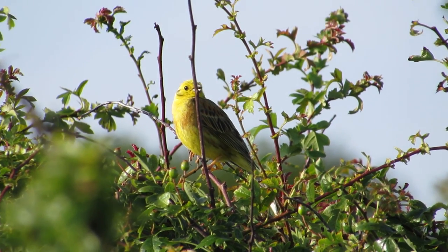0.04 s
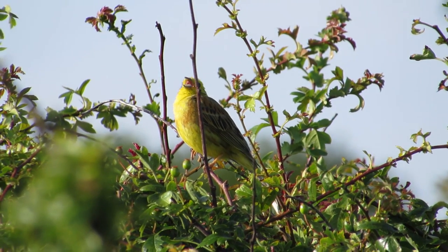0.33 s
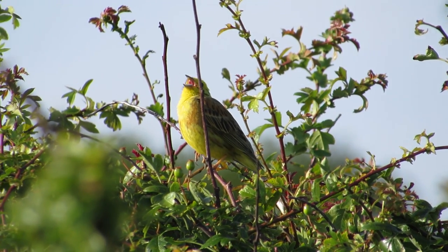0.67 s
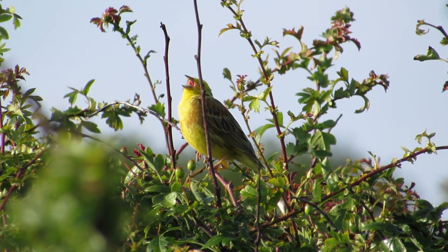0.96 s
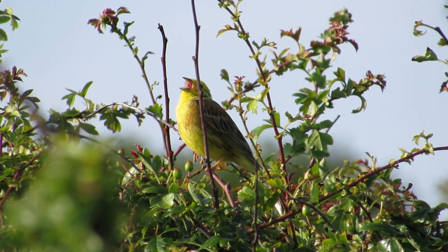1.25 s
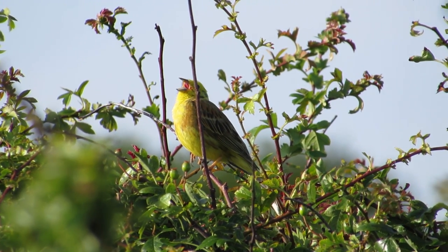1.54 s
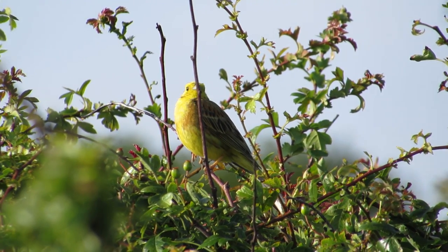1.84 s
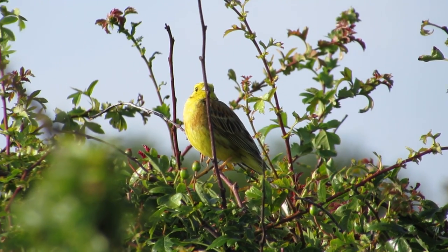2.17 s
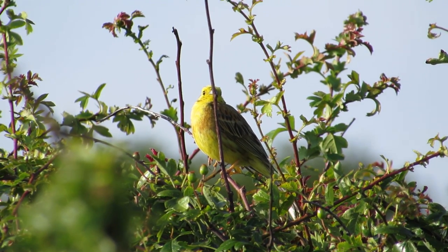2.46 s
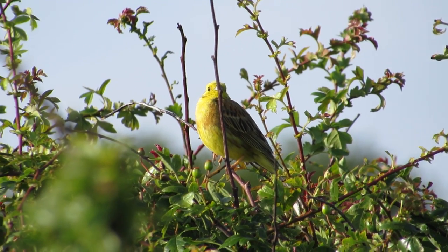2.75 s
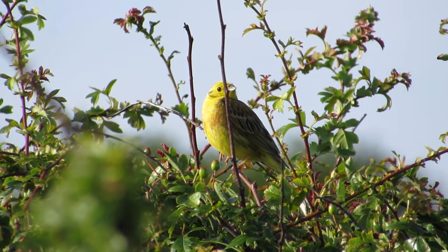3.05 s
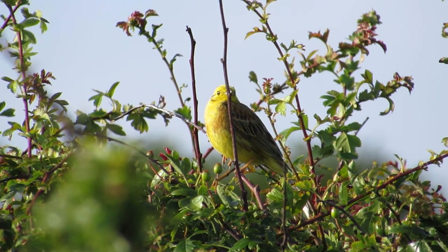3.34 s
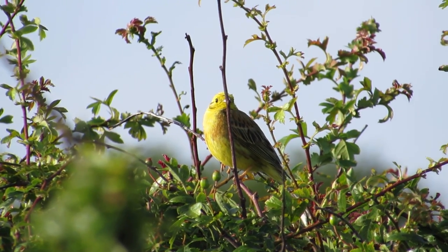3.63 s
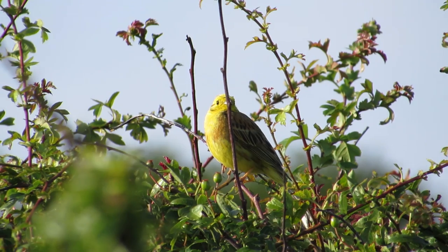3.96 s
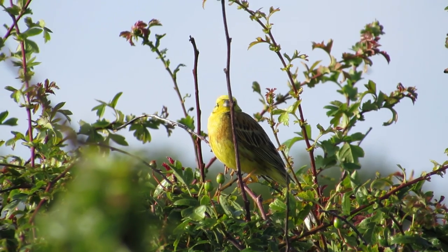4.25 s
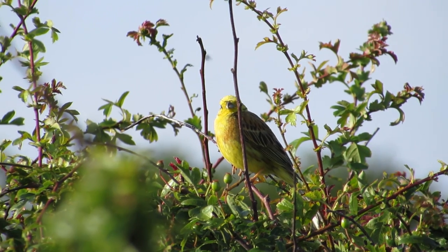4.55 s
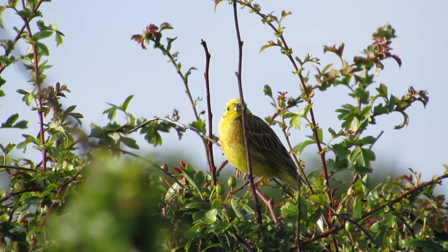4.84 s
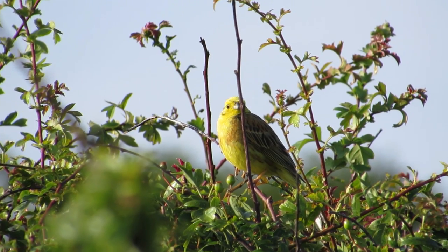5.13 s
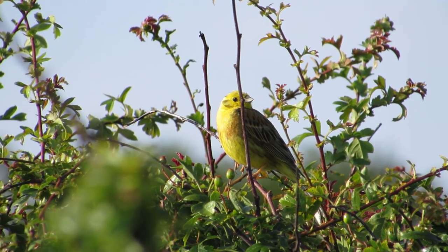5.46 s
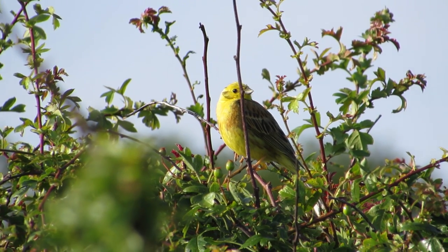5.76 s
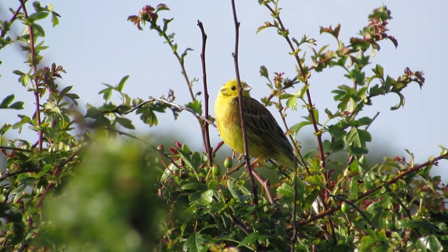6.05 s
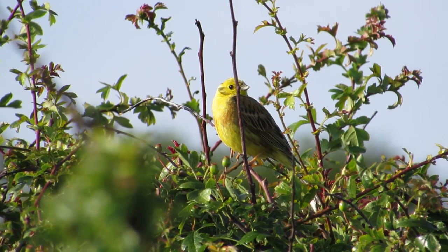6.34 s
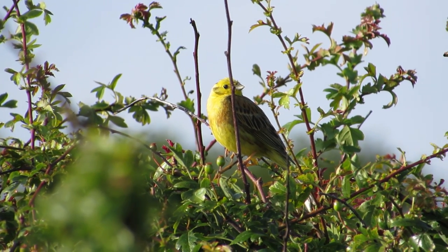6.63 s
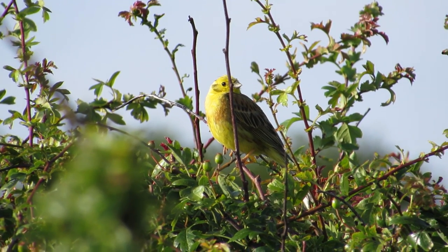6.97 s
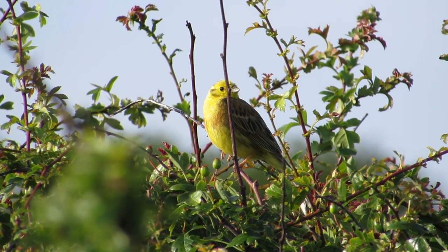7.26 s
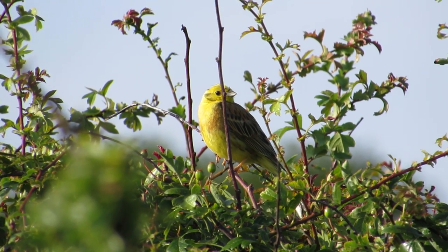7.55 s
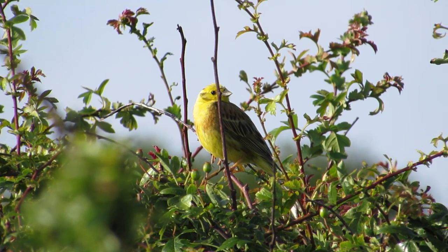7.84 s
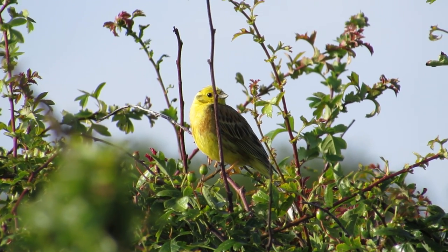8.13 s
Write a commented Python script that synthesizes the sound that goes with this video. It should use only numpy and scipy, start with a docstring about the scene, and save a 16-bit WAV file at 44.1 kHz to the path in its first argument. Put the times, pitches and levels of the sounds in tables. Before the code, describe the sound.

Outdoors by a hedge, a nearby bird opens with a fast, swelling run of buzzy notes and a held high note, with a short hollow knock at the start. It then falls silent, leaving quiet falling chirps off to the left, faint whistles and hoarse far calls. An echoing clatter sounds in the distance, and later another soft knock. Gentle air, microphone hiss and a faint camera whirr continue throughout.

```python
"""Yellowhammer in a hedge

Close to the microphones a yellowhammer sings twelve quick falling syllables that swell, then one long,
thin buzzing note. Farther off to the left another bird repeats falling chirps; others twitter and call
faintly in the distance. Two knocks ring a hollow body and a far clatter arrives blurred by its echoes.
Under it all lie open-air hush, microphone hiss and the hum and whirr of the camera."""
import sys
import numpy as np
from scipy import signal
from scipy.fft import rfft, irfft
from scipy.io import wavfile

SR = 44100
rng = np.random.default_rng(int(sys.argv[2]) if len(sys.argv) > 2 else 0)


def wav_out(sig):
    """Save sig, one row per channel (or a flat mono array), as 16-bit PCM at SR to the path in sys.argv[1]."""
    wavfile.write(sys.argv[1], SR, np.round(np.clip(np.atleast_2d(sig).T, -1, 1) * 32767).astype(np.int16))


N = 366030
HZ = np.fft.rfftfreq(N, 1 / SR)

# steady noise of the open air, the microphones and the camera: frequency_hz, level_db_per_hz
AIR_SPECTRUM = [(15, -78), (35, -80), (50, -71), (62, -81), (78, -63), (100, -80), (170, -82.5),
                (400, -83.5), (900, -78.5), (1500, -81), (2400, -90), (3500, -88.5), (4500, -100),
                (16000, -125)]
HISS_SPECTRUM = [(20, -85.5), (4400, -92), (7000, -93), (8600, -96), (11000, -100), (13500, -104),
                 (15200, -110)]
WHIRR_SPECTRUM = [(20, -91), (100, -100), (180, -77.5), (300, -73), (440, -77), (700, -79), (1000, -102),
                  (2000, -100), (16000, -140)]
# resonances of the camera's case: frequency_hz, half_width_hz, level_db_per_hz, left_over_right_db
CASE_MODES = [(505.7, 25, -72, -3), (577, 32, -65.5, -3), (728, 32.4, -62.5, -5), (829.7, 31, -64.5, -6),
              (927.5, 52, -68.5, -11.5), (999, 44, -70.5, -7), (1215, 21, -76, -21), (1363, 16.5, -72.5, 1),
              (2135, 11, -78.5, -6)]
# the camera's steady tones: frequency_hz, rms_db, left_over_right_db, left_lead_rad
HUM_TONES = [(38.7, -54.5, -7.5, -0.42), (66.8, -53, -9.5, -0.26), (136, -67, -6, -0.063),
             (13252, -85.5, 4, -1.4)]
# the yellowhammer's syllables: strongest_flick_s, level_db, swell_delay_s
SONG_SYLLABLES = [(0.0408, -47, 0.002), (.1435, -41.5, 0.0038), (0.2445, -32, -0.00015),
                  (.339, -29.5, 0.0026), (.434, -26, .0065), (.532, -23.5, 0.0046), (.632, -21.5, .0007),
                  (.728, -19.5, 0.00013), (0.8213, -19.5, .0005), (.9175, -18.5, 0), (1.012, -17, .0029),
                  (1.109, -17.5, 0.0022)]
# blows on a hollow body: start_s, peak_db, rattle_s, tilt_db_per_octave
KNOCK_BLOWS = [(.2217, -24.2, .01, 1), (7.2058, -28.7, .005, -4)]
# resonances of that body: frequency_hz, level_db, t60_s, left_over_right_db
BODY_MODES = [(480, -10, .04, -2), (690, -2, .04, -2), (830, 3, .05, -2), (1000, 0, .04, 0),
              (1180, -2, .045, 1), (1362, -3, .034, 2), (1690, -10, .03, 3), (2220, -3, .031, 6),
              (2520, -6, .025, 7), (3040, -3, .03, 7), (3480, -6, .02, 7), (4250, -12, .012, 6)]
# the bird off to the left: loudest_s, level_db, pitch_hz, fall_hz_per_s, burr_fraction, rise_s
LEFT_CHIRPS = [(.676, -48, 3080, 12400, .05, .05), (1.19, -48, 2994, 15100, 0, .042),
               (2.01, -47.5, 3220, 14030, .05, .056), (2.729, -50.5, 3150, 12000, 0.05, .052),
               (3.45, -51, 3080, 14460, .05, .04), (4.184, -46.5, 3050, 17000, 0.1, 0.041),
               (4.404, -43, 3244, 13540, 0.88, 0.054), (4.688, -41, 3420, 22500, 0.4, 0.047),
               (5.32, -45, 3090, 12530, 0.13, .056), (6.225, -44.5, 3140, 13460, .1, .052),
               (7.084, -45, 3110, 12000, 0, .052), (7.316, -43.5, 3260, 13500, 0.99, 0.057),
               (7.736, -47, 3200, 9400, .5, .05)]
# hoarse calls from far off: start_s, length_s, level_db, centre_hz
HOARSE_CALLS = [(1.58, 0.15, -58, 1500), (5.336, 0.17, -54, 1597), (5.849, 0.24, -55.5, 1620),
                (6.199, 0.19, -58, 1544), (6.651, 0.094, -56.5, 1617)]
# the long note's end flick, then pips of small birds: start_s, level_db, start_pitch_hz, rise_hz
RISING_GLIDES = [(1.817, -54, 4800, 1100), (2.49, -57, 4900, 800), (4.592, -56.5, 6400, 450),
                 (5.087, -60, 6550, 350), (5.32, -58, 6600, 250)]
# the songbird across the field: start_s, length_s, level_db, pitch_hz, range_hz
FAR_PHRASES = [(2.97, .28, -56, 2280, 148.6), (3.6, 0.29, -57.5, 2280, 151), (4.788, .31, -55.5, 1980, 25)]
# distant bangs: start_s, level_db, t60_s
FAR_BANGS = [(4.324, -38.5, .7), (4.385, -52, 0.92)]
# their colour at the microphones: frequency_hz, level_db
BANG_SPECTRUM = [(300, -30), (700, -11), (1050, -2), (1650, -1.5), (2100, -12.5), (3200, -10), (4500, -22),
                 (8000, -40)]
# decay of the scatter from leaves and ground: frequency_hz, t60_s
SCATTER_DECAY = [(200, 0.21), (1500, 0.1), (5000, 0.27), (12000, 0.044)]
# the camera's narrow filters: frequency_hz, half_width_hz
CAMERA_NOTCHES = [(3950, 158), (7900, 106)]


def gain_of(db):
    """Decibels to amplitude."""
    return 10 ** (np.asarray(db) / 20)


def panned(pan_db):
    """Gains at the two microphones, the left pan_db above the right."""
    return gain_of([[pan_db / 2], [-pan_db / 2]])


def unit_rms(x):
    """Scales to an rms of 1."""
    return x / np.sqrt(np.mean(x ** 2) + 1e-20)


def curve_at(points, hz):
    """Reads a curve along a log-frequency axis."""
    frequency, value = np.transpose(points)
    return np.interp(np.log(hz + 1), np.log(frequency + 1), value)


def add(mix, start_s, sound):
    """Adds a sound into the mix at start_s."""
    part = mix[..., max(round(start_s * SR), 0):][..., :sound.shape[-1]]
    part += sound[..., :part.shape[-1]]


def wander(size, hz):
    """Smooth random motion of rms about 1, rolled off above hz."""
    padded = 2 * SR + size
    rolloff = 1 + (np.fft.rfftfreq(padded, 1 / SR) / hz) ** 4
    return unit_rms(irfft(rfft(rng.standard_normal(padded)) / rolloff))[:size]


def white():
    """Spectrum of white noise with unit power per Hz."""
    return rfft(rng.standard_normal(N)) * np.sqrt(SR / 2)


def diffuse_noise(spectrum):
    """Coloured noise, independent at each microphone."""
    return irfft(np.array([white(), white()]) * gain_of(curve_at(spectrum, HZ)), N)


def whistle(hz, octave_db, twelfth_db=-46):
    """A bird's nearly pure tone with two weak overtones."""
    phase = 2 * np.pi * np.cumsum(hz) / SR
    return np.sin(phase) + gain_of(octave_db) * np.sin(2 * phase) + gain_of(twelfth_db) * np.sin(3 * phase)


def outdoors(direct, pan_db, wet_db):
    """Direct sound plus the scatter from leaves and ground, different at each microphone."""
    echoes = rng.standard_normal((2, SR // 2)) * (rng.random((2, SR // 2)) < .1)
    hz, t, bands = signal.stft(echoes, SR, nperseg=256)
    decay_db = -60 * t / curve_at(SCATTER_DECAY, hz)[:, None]
    tail = signal.istft(bands * gain_of(decay_db) * (t > 0), SR)[1]
    scatter = signal.fftconvolve(direct[None], tail / np.linalg.norm(tail[0]), axes=1)[:, :N]
    return (direct + gain_of(wet_db) * scatter) * panned(pan_db)


def hush(swell_db=.62):
    """Gently swelling open air all around, over the even hiss of the microphones."""
    air, hiss = diffuse_noise(AIR_SPECTRUM), diffuse_noise(HISS_SPECTRUM)
    return air * gain_of(swell_db * wander(N, 3.4)) + hiss


def camera_whirr(lead_rad=2.172, left_db=-1):
    """The camera's mechanism shakes its case, pushing the two microphones in nearly opposite senses."""
    spectrum = white() * gain_of(curve_at(WHIRR_SPECTRUM, HZ)) * np.array([[-gain_of(left_db)], [1]])
    for hz, half_width, db, pan_db in CASE_MODES:
        mode = white() * gain_of(db) / (1 + 1j * (HZ - hz) / half_width) ** 2
        spectrum += mode * np.array([[gain_of(pan_db) * np.exp(1j * lead_rad)], [1]])
    return irfft(spectrum, N)


def camera_hum(waver=.18, drift_hz=.19):
    """Low wavering hum and a thin electronic whine, right at the microphones."""
    out = np.zeros((2, N))
    for hz, db, pan_db, lead_rad in HUM_TONES:
        phase = 2 * np.pi * np.cumsum(hz + drift_hz * wander(N, 2.9)) / SR
        tone = np.sqrt(2) * np.sin(phase + np.array([[lead_rad], [0]]))
        out += gain_of(db) * panned(pan_db) * tone * (1 + waver * wander(N, 6.8))
    return out


def yellowhammer_syllables(flick_hz=86, swing_hz=250, buzz_hz=245, rasp_hz=90, jitter_hz=45):
    """Close by, each syllable opens as a reedy buzz; deep vibrato then breaks its fall into flicks."""
    swell_s, cut_s, edge_db, shimmer_db = .048, .032, -38.5, 1.25
    top_hz, end_hz, slide_lead_s, slide_s = 6120, 4940, .043, .06
    full_voice_db, flat_hz_per_db = -17.5, 15
    pure_octave_db, reedy_octave_db = -36, -22
    out = np.zeros(N)
    for flick_s, db, delay in SONG_SYLLABLES:
        t = np.arange(max(delay - swell_s, -flick_s), delay + cut_s, 1 / SR)
        from_peak = t - delay
        swell_db = edge_db * np.where(from_peak < 0, (from_peak / swell_s) ** 2, (from_peak / cut_s) ** 3)
        slide = np.sin(np.pi / 2 * np.clip((from_peak + slide_lead_s) / slide_s, 0, 1)) ** 2
        start_hz = top_hz - flat_hz_per_db * (full_voice_db - db)  # softer syllables start lower
        buzzing = np.clip((-.01 - from_peak) / .015, 0, 1)  # gone 10 ms before the peak
        flicking = np.clip((t + .012) / .008, 0, 1)
        flick_phase = 2 * np.pi * flick_hz * t
        buzz_phase = 2 * np.pi * (buzz_hz * t + rng.random())
        vibrato = np.sin(flick_phase) - .15 * np.sin(2 * flick_phase)  # slow rise, quick drop
        hz = start_hz + (end_hz - start_hz) * slide + swing_hz * flicking * vibrato
        hz += rasp_hz * buzzing * np.sin(buzz_phase) + jitter_hz * wander(len(t), 520)
        # the syrinx nearly shuts on every downswing
        gate = 1 - .96 * flicking * abs(np.sin(flick_phase / 2)) ** 3
        flutter = 1 - (.08 + .72 * buzzing) * np.sin(buzz_phase / 2) ** 2
        tone = whistle(hz, pure_octave_db + buzzing * (reedy_octave_db - pure_octave_db))
        effort_db = db + swell_db + shimmer_db * wander(len(t), 250)
        add(out, flick_s + t[0], gain_of(effort_db) * gate * flutter * tone)
    return outdoors(out, pan_db=.9, wet_db=-20)


def knocks(rattle=.1, cutoff_hz=4800):
    """A blow and a brief rattle ring the same hard, hollow body."""
    out, t = np.zeros((2, N)), np.arange(SR // 4) / SR
    lowpass = signal.butter(4, cutoff_hz, fs=SR, output="sos")
    for start_s, peak_db, rattle_s, tilt_db in KNOCK_BLOWS:
        force = rattle * rng.standard_normal(len(t)) * np.exp(-(t / rattle_s) ** 2)
        force *= rng.random(len(t)) < .3
        force[0] = 1  # the blow itself
        body = np.zeros((2, len(t)))
        for k, (hz, mode_db, t60, pan_db) in enumerate(BODY_MODES):
            ring_db = mode_db + tilt_db * np.log2(hz / 1000) - 60 * t / t60
            body += (-1) ** k * panned(pan_db) * gain_of(ring_db) * np.sin(2 * np.pi * hz * t)
        hit = signal.sosfilt(lowpass, signal.fftconvolve(force[None], body, axes=1))
        add(out, start_s, gain_of(peak_db) * hit / abs(hit.mean(0)).max())
    return out


def chirps(warble_hz=135, jitter_hz=80, clear_swing_hz=55, burred_swing_hz=220):
    """Farther off to the left, clear chirps fall and ease off; burred ones warble and steepen."""
    onset_db, tail_s, fade_db_per_s, burr_fade_db_per_s = -15, .072, 194, 130
    clear_ease_per_s, burred_ease_per_s = 19, -6
    out = np.zeros(N)
    for loudest_s, db, pitch, fall, burr, rise_s in LEFT_CHIRPS:
        t = np.arange(-rise_s, tail_s, 1 / SR)
        ease = (1 - burr) * clear_ease_per_s + burr * burred_ease_per_s
        fallen_hz = np.cumsum(fall * np.exp(-ease * t)) / SR
        swing = ((1 - burr) * clear_swing_hz + burr * burred_swing_hz) * np.clip(1 - t / tail_s, 0, 1)
        hz = pitch + np.interp(0, t, fallen_hz) - fallen_hz
        hz += swing * np.sin(2 * np.pi * warble_hz * t) + jitter_hz * wander(len(t), 370)
        fade_db = -(fade_db_per_s + burr * burr_fade_db_per_s) * t
        swell_db = np.where(t < 0, onset_db * abs(t / rise_s) ** 3, fade_db)
        add(out, loudest_s + t[0], gain_of(db + swell_db) * whistle(hz, octave_db=-32))
    return outdoors(out, pan_db=6, wet_db=-8)


def yellowhammer_long_note(buzz_hz=260, depth=.25, swing_hz=55, lag_rad=.43):
    """A held whistle whose pitch and strength flutter almost together, lifting a side tone above it."""
    start_s, hold_s, attack_s, release_s = 1.203, .593, .028, .022
    level_db, loudest_s, swell_db, swell_s = -32, 1.6, 1.5, .13
    pitch_hz, sharp_hz, settle_s, sag_hz_per_s = 5120, 47.7, .0425, 76
    t = np.arange(-attack_s, hold_s + release_s, 1 / SR)
    buzz_phase = 2 * np.pi * np.cumsum(buzz_hz + 4 * wander(len(t), 40)) / SR
    hz = pitch_hz + sharp_hz * np.exp(-t / settle_s) - sag_hz_per_s * t
    hz += swing_hz * np.cos(buzz_phase - lag_rad) + 15 * wander(len(t), 300) + 4.5 * wander(len(t), 30)
    fade = np.interp(t, [t[0], 0, hold_s, t[-1]], [0, 1, 1, 0]) ** 2
    swell = np.exp(-((start_s + t - loudest_s) / swell_s) ** 2)
    strength = gain_of(level_db + swell_db * swell) * fade * (1 + depth * np.cos(buzz_phase))
    strength *= 1 + .05 * wander(len(t), 150) + .07 * wander(len(t), 20)
    out = np.zeros(N)
    add(out, start_s + t[0], strength * unit_rms(whistle(hz, octave_db=-38)))
    return outdoors(out, pan_db=0, wet_db=-23)


def far_calls(width_hz=340):
    """Distance leaves only one throat resonance of each hoarse call, wrapped in its echo."""
    out = np.zeros(N)
    for start_s, length_s, db, hz in HOARSE_CALLS:
        t = np.arange(0, length_s, 1 / SR)
        rasp = wander(len(t), width_hz) + 1j * wander(len(t), width_hz)
        call = (rasp * np.exp(2j * np.pi * hz * t)).real
        add(out, start_s, gain_of(db) * signal.windows.tukey(len(t), .7) * call)
    return outdoors(out, pan_db=0, wet_db=-12)


def rising_glides(length_s=.042, jitter_hz=75):
    """Thin, faint glides: the flick ending the yellowhammer's long note, then pips some way off."""
    out, size = np.zeros(N), int(length_s * SR)
    for start_s, db, start_hz, rise_hz in RISING_GLIDES:
        hz = start_hz + np.linspace(0, rise_hz, size) + jitter_hz * wander(size, 160)
        add(out, start_s, gain_of(db) * signal.windows.hann(size) * whistle(hz, octave_db=-40))
    return outdoors(out, pan_db=0, wet_db=-4)


def far_song(turn_hz=14, uneven_db=2, notes_per_s=10, jitter_hz=75):
    """A songbird far across the field whistles short phrases of meandering notes."""
    out = np.zeros(N)
    for start_s, length_s, db, pitch, range_hz in FAR_PHRASES:
        t = np.arange(0, length_s, 1 / SR)
        hz = pitch + range_hz * wander(len(t), turn_hz) + jitter_hz * wander(len(t), 160)
        notes = np.sin(np.pi * notes_per_s * t) ** 2 * signal.windows.tukey(len(t), .2)
        strength = gain_of(db + uneven_db * wander(len(t), turn_hz))
        add(out, start_s, strength * notes * whistle(hz, octave_db=-40))
    return outdoors(out, pan_db=0, wet_db=-2)


def far_clatter(rise_s=.008):
    """Far bangs reach the microphones smeared into a dull wash by their echoes."""
    strength, t = np.zeros(N), np.arange(SR) / SR
    for start_s, db, t60 in FAR_BANGS:
        add(strength, start_s, np.minimum(t / rise_s, 1) * gain_of(db - 60 * t / t60))
    return strength * unit_rms(diffuse_noise(BANG_SPECTRUM))


def scene():
    """Background, birds and knocks as heard from beside the hedge."""
    background = hush() + camera_whirr() + camera_hum()
    yellowhammer = yellowhammer_syllables() + yellowhammer_long_note()
    faint_birdsong = chirps() + far_calls() + rising_glides() + far_song()
    return background + yellowhammer + knocks() + faint_birdsong + far_clatter()


def record(dry):
    """The camera cuts two narrow notches, then limits the band."""
    for hz, half_width in CAMERA_NOTCHES:
        dry = signal.lfilter(*signal.iirnotch(hz, hz / (2 * half_width), fs=SR), dry)
    lowpass = signal.firwin(511, cutoff=15150, window=("kaiser", 9), fs=SR)
    return signal.oaconvolve(dry, lowpass[None], "same")


dry = scene()
out = record(dry)
wav_out(out)
```